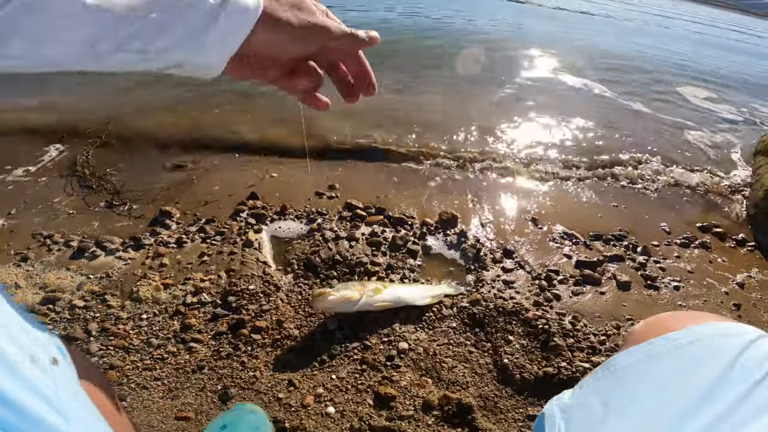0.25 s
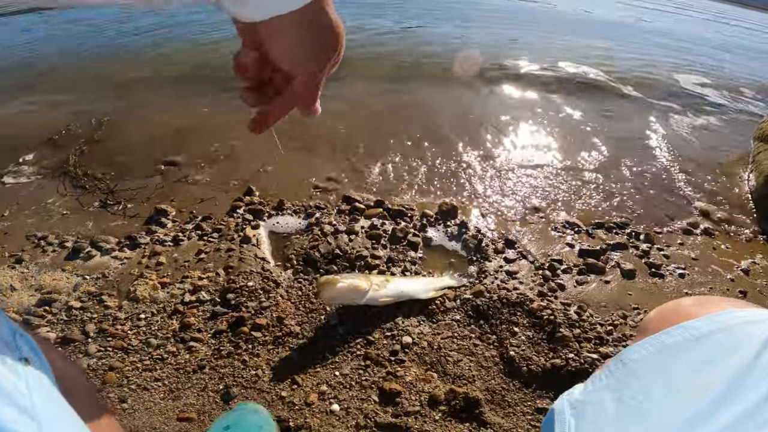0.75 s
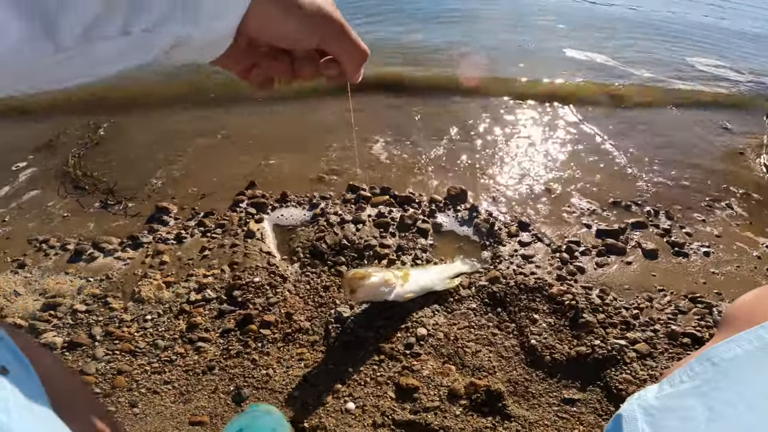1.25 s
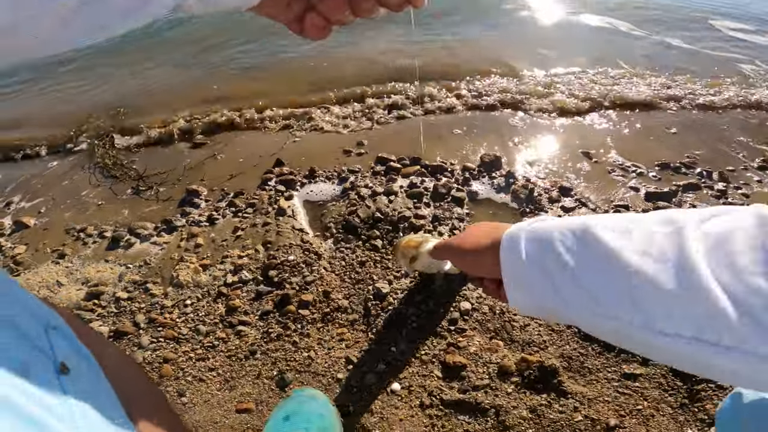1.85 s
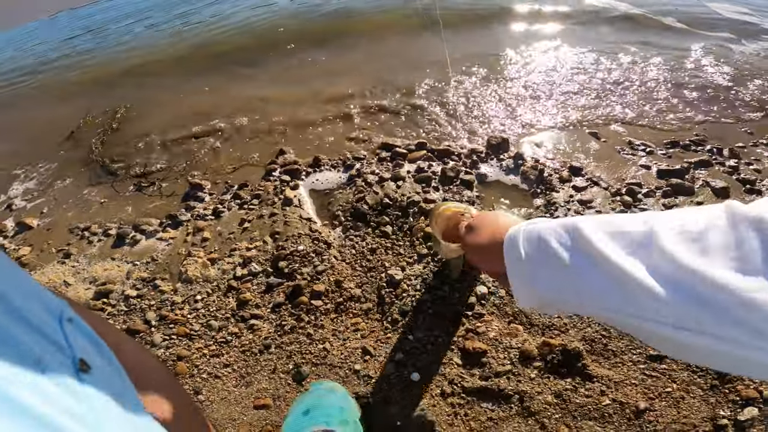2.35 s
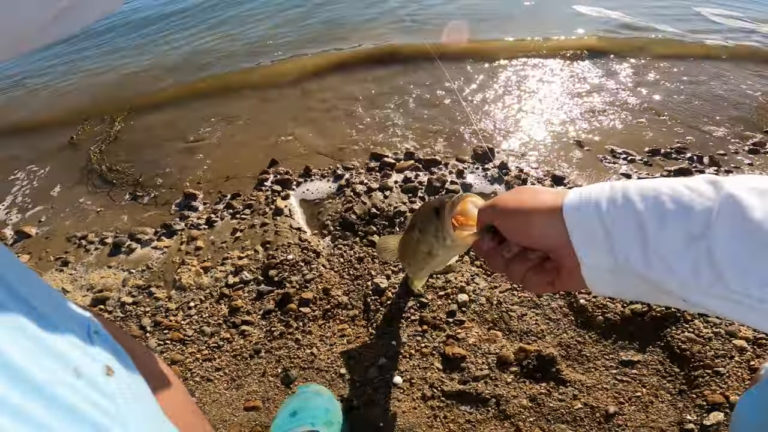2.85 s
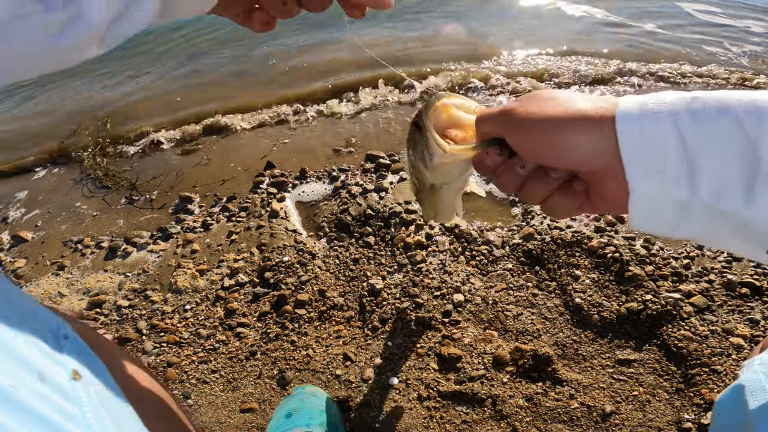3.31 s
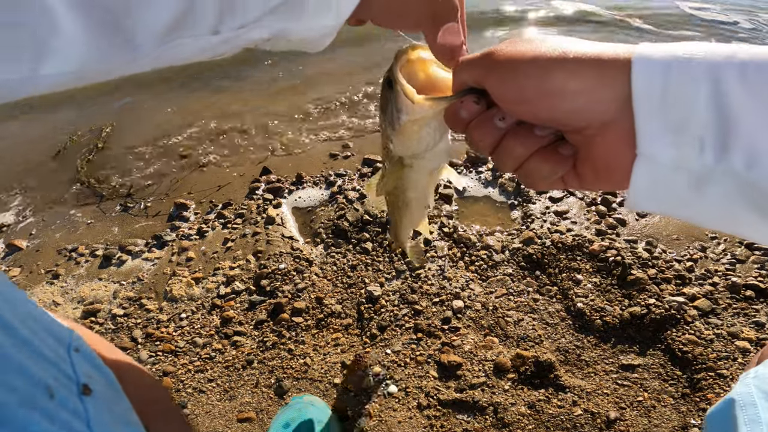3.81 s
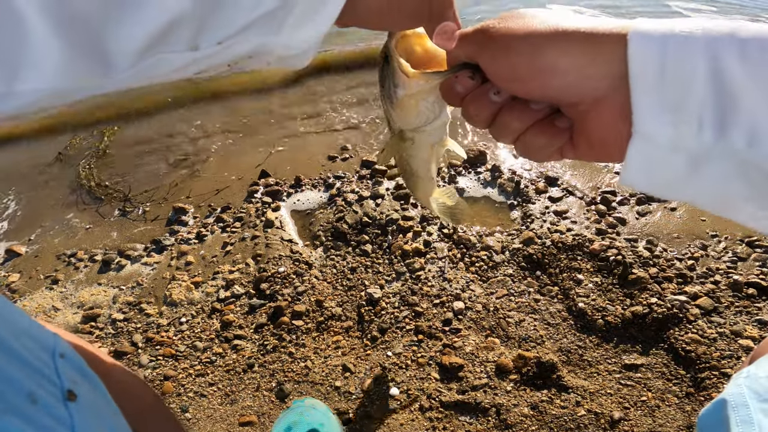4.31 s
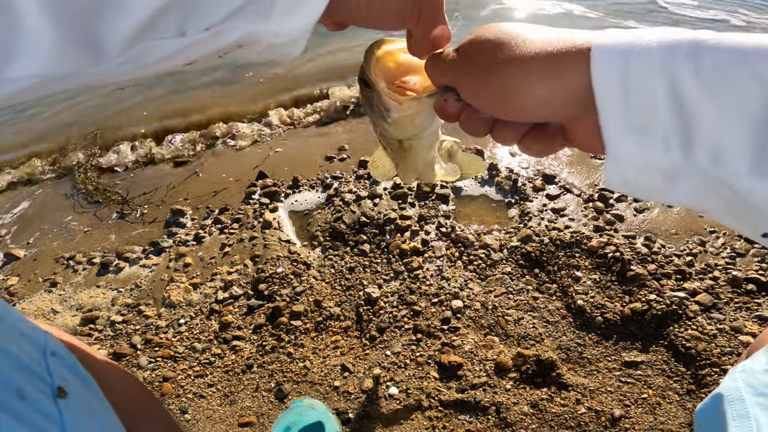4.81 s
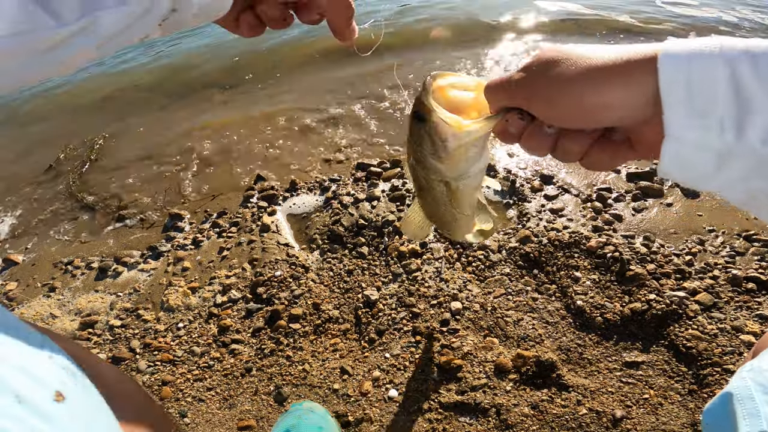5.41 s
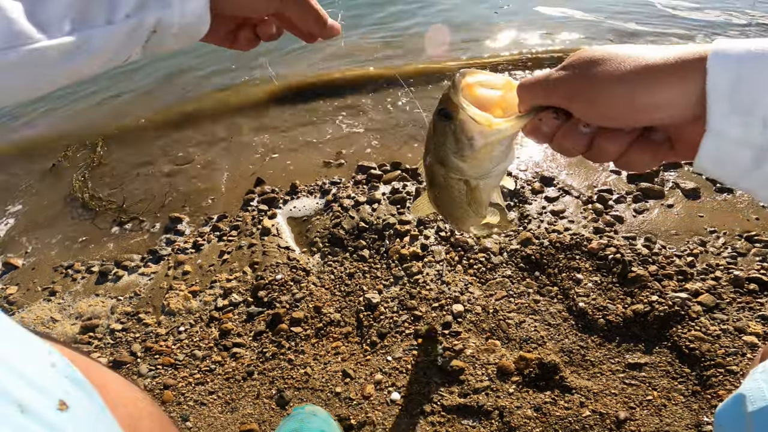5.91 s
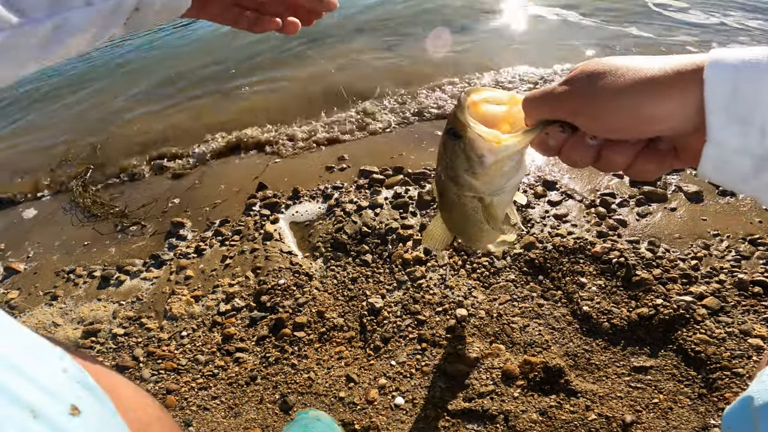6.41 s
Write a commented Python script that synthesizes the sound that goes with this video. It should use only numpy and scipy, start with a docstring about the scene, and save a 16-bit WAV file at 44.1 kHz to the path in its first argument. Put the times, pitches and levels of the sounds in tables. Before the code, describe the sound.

Small waves lap softly on a pebbly lake shore, heard from close to the water. They crest at about 0.3, 1.8, 3.5, 5.0 and 6.4 seconds. Each folds over with a light splash and a fizz of spray, while trapped air gives low, hollow gulps, small bubbles plink and droplets tick on the stones. The first wave is the gentlest, the second breaks quickly with the most fizz, and the third and fourth gurgle more fully. Between them, foam hisses away and the backwash bubbles quietly among the pebbles. At about 4.8 seconds, just before the fourth crest, something tiny and hard gives one short, bright click, close by and slightly to the left. A faint hiss of farther water and the low rumble of a light breeze continue underneath until the end, at about 6.7 seconds.

```python
"""Small waves on a pebbly lake shore.

Each wave folds over with a fizz of spray, traps pockets of air that gurgle, and drains among the stones.
Bubbles are damped sines rising in pitch; drops crack and ring on the stones. Something small snaps once,
close by on the left. Far water hisses, a light breeze rumbles, the microphone ports ring in the treble."""
import sys
import numpy as np
from scipy import signal
from scipy.fft import rfft, irfft, next_fast_len
from scipy.io import wavfile
from scipy.ndimage import uniform_filter1d, map_coordinates

SR = 44100
rng = np.random.default_rng(int(sys.argv[2]) if len(sys.argv) > 2 else 0)


def to_wav(sig):
    """Store sig (one row per channel, or 1-D mono) as 16-bit WAV at the path in sys.argv[1].

    Samples outside -1..1 are clipped; the rate is SR.
    """
    pcm = np.clip(np.atleast_2d(sig), -1, 1) * 32767
    pcm = np.round(pcm).astype(np.int16)
    wavfile.write(sys.argv[1], SR, pcm.T)  # frames by channels


N = 293739


def wash():
    """Body of the waves: low gurgle, mid splash, treble fizz and spatter, lingering foam."""
    # spectral shapes: f/Hz, density/dB
    gurgle_shape = [(110, -43), (160, -26), (210, 3), (390, 1.5), (600, -4.5), (850, -5), (1200, -39)]
    splash_shape = [(200, -58), (400, -9), (750, -9), (1150, -5), (1550, -8.5), (1900, -6.5), (2700, -10.5),
                    (4200, -13), (8000, -21.5)]
    fizz_shape = [(250, -45), (600, -11), (2000, 0.5), (4000, -2.5), (7000, -1), (12000, 0), (14500, 0.5),
                  (16000, -4.5)]
    foam_shape = [(1200, -30), (3000, -2.5), (7000, 0.5), (11000, 1), (16000, -7)]
    gurgle_gain, splash_gain, fizz_gain, foam_gain, pitch_hz = surges()
    steady = np.ones(N)
    vigour = np.clip((20 * np.log10(fizz_gain) + 71) / 18, .15, 1)  # calm backwash to breaking crest
    gurgle = swarm(gurgle_shape, pitch_hz, steady, octaves=0.343, cycles=15.5, rise=0.609, onset=0.052,
                   scatter_db=3.5, share=0.85, patchy_db=-0.5, throb_db=0.77, count=1700, samples=3500)
    splash = swarm(splash_shape, 1400 * steady, steady, octaves=0.698, cycles=21, rise=0.32, onset=0.13,
                   scatter_db=6, share=0.49, patchy_db=3, throb_db=0.9, count=5000, samples=900)
    fizz = swarm(fizz_shape, 7000 * steady, vigour, octaves=0.714, cycles=9, rise=0.2, onset=0.068,
                 scatter_db=0, share=0.39, patchy_db=4, throb_db=1.6, count=6000, samples=120)
    foam = coloured(patchy(depth_db=2.5), foam_shape)
    body = gurgle_gain * gurgle + splash_gain * splash + fizz_gain * fizz + foam_gain * foam
    return body + spatter(fizz_gain)


def surges():
    """Gains of gurgle, splash, fizz and foam; gurgle pitch, led by the loudest surge."""
    # breaking waves: crest/s, rise/s, hold/s, drain/s, gurgle/dB, gurgle/Hz, splash/dB, fizz/dB, foam/dB
    waves = [(0.341, 0.26, 0.23, 0.28, -49.5, 346, -49, -48.5, -54.5),
             (1.815, 0.088, 0.36, 0.22, -40, 346, -42.5, -41, -51),
             (3.479, 0.25, 0.072, 0.25, -38.5, 447, -41, -44.5, -66),
             (4.981, 0.25, 0.087, 0.22, -36, 393.7, -38.5, -43.5, -57.5),
             (6.358, 0.1, 0.04, 0.5, -40, 350.7, -41, -45, -65)]
    # lips curling ahead of the crests: t/s, hold/s, gurgle/dB, splash/dB, fizz/dB
    curls = [(-0.05, 0.34, -47.5, -46.5, -47.5), (1.641, 0.021, -52, -48.5, -43.5),
             (3.207, 0.49, -61.5, -56.5, -45), (4.742, 0.23, -56.5, -52.5, -48.5),
             (6.14, 0.2, -54, -53.5, -51.5)]
    # backwash among the stones: peak/s, drain/s, gurgle/dB, splash/dB, fizz/dB
    sloshes = [(0.84, 0.63, -51, -53, -55), (1.123, 0.77, -48, -54.5, -83), (1.42, 0.87, -61, -64, -83),
               (2.398, 0.39, -47.5, -59, -54), (2.62, 0.71, -45.5, -55, -56.5),
               (2.95, 0.034, -68, -63, -61), (3.9, 1, -57.5, -71, -59.5), (4.177, 0.75, -48.5, -56, -59.5),
               (4.52, 0.45, -54, -60, -60.5), (5.48, 0.6, -55.5, -64, -61), (5.647, 0.39, -47.5, -57, -90),
               (6.03, 0.23, -57, -60, -61.5)]
    air_lag_s, air_min_rise_s, curl_hz = 0.042, 0.073, 400  # trapped air answers after the crest
    gurgle, pitch, splash, fizz, foam = [], [], 0, 0, 0
    for s, rise, hold, drain, gurgle_db, gurgle_hz, splash_db, fizz_db, foam_db in waves:
        gurgle.append(lap(s + air_lag_s, max(rise, air_min_rise_s), hold, drain, gurgle_db))
        pitch.append(pocket_pitch(s + air_lag_s, gurgle_hz))
        splash += lap(s, rise, hold, drain, splash_db)
        fizz += lap(s, rise, 0.89 * hold, 1.11 * drain, fizz_db)
        foam += lap(s, rise, hold, drain_s=2.23, db=foam_db)
    minor = [(lap(s, rise_s=0.027, hold_s=hold, drain_s=0.314), curl_hz, levels)
             for s, hold, *levels in curls]
    minor += [(lap(s, rise_s=0.254, hold_s=0, drain_s=drain), pocket_pitch(s, peak_hz=429.7), levels)
              for s, drain, *levels in sloshes]
    for power, hz, (gurgle_db, splash_db, fizz_db) in minor:
        gurgle.append(amp(gurgle_db) ** 2 * power)
        pitch.append(hz)
        splash += amp(splash_db) ** 2 * power
        fizz += amp(fizz_db) ** 2 * power
    pitch_hz = sum(power * hz for power, hz in zip(gurgle, pitch)) / sum(gurgle)
    return np.sqrt(sum(gurgle)), np.sqrt(splash), np.sqrt(fizz), np.sqrt(foam), pitch_hz


def lap(peak_s, rise_s, hold_s, drain_s, db=0):
    """Power of one surge: rise, sagging hold and drain, each linear in dB."""
    span_db, sag_db_per_s = 20, 12.5
    t = np.arange(N) / SR - peak_s
    spans_below = np.maximum(-t / rise_s, (t - hold_s) / drain_s).clip(0)
    return amp(db - span_db * spans_below - sag_db_per_s * t.clip(0, hold_s)) ** 2


def pocket_pitch(peak_s, peak_hz):
    """Air pockets shrink as a surge runs out, so their pitch climbs."""
    climb_oct_per_s, range_hz = 2.59, (260, 682)
    return np.clip(peak_hz * 2 ** (climb_oct_per_s * (np.arange(N) / SR - peak_s)), *range_hz)


def swarm(shape, centre_hz, vigour, octaves, cycles, rise, onset,
          scatter_db, share, patchy_db, throb_db, count, samples):
    """Random bubbles over patchy noise, rms 1; vigorous water is grainier and throbs more."""
    at = rng.integers(0, N, count)
    hz = np.clip(centre_hz[at] * 2 ** (octaves * rng.standard_normal(count)), 120, 15000)
    db = scatter_db * np.clip(rng.standard_normal(count), -3, 2)
    crowd = coloured(bubbles(at / SR, db, hz, cycles, rise, onset, samples), shape)
    noise = coloured(patchy(patchy_db), shape)
    share = np.clip(share * vigour, 0, 1)
    mix = np.sqrt(share) * crowd + np.sqrt(1 - share) * noise
    throb = amp(throb_db * vigour * (wobble(17) + 0.48 * wobble(45)))
    return unit(mix * throb)


def bubbles(s, db, hz, cycles, rise, onset, samples):
    """Damped sines that climb as each bubble nears the surface; two strands."""
    t = np.arange(samples) / SR
    age = t * (hz / cycles)[:, None]  # in lifetimes, like onset
    taper = np.cos(np.pi / 2 * t * SR / samples)
    envelope = amp(db[:, None] - 32.4 * age) * (1 - np.exp(-age / onset)) * taper
    phase = 2 * np.pi * hz[:, None] * t * (1 + np.reshape(rise, (-1, 1)) * np.minimum(age, 2) / 2)
    at = (np.round(s * SR).astype(int)[:, None] + np.arange(samples)).ravel()
    offset_rad = 2 * np.pi * rng.random((len(s), 1))
    strands = [envelope * np.sin(phase + k * offset_rad) for k in (0, 1)]
    return np.array([np.bincount(at, strand.ravel(), N + samples)[:N] for strand in strands])


def pockets():
    """Single air pockets gulp; small bubbles plink, each shedding a brood of three."""
    # large air pockets: t/s, level/dB, f/Hz, life/cycles
    gulps = [(0.228, -25, 227, 5.6), (0.337, -19, 306, 11.4), (0.404, -29, 334, 10),
             (0.818, -26.5, 433, 24), (1.141, -25, 438, 19), (1.415, -29.5, 328, 8.8),
             (1.818, -20, 223, 7.2), (1.863, -20.5, 373, 5.9), (1.895, -29, 335, 5.5),
             (1.989, -20.5, 399, 19), (2.175, -21, 560, 7.7), (2.24, -27, 322, 8), (2.533, -32, 245, 9.2),
             (2.44, -40, 400, 4.9), (2.698, -24, 392, 3.4), (2.945, -34, 390, 17), (3.323, -24, 302, 5.6),
             (3.369, -20.5, 254, 5.8), (3.47, -15.5, 336, 3.9), (3.527, -19, 407, 18),
             (4.745, -27.5, 257, 7.9), (4.823, -18.5, 273, 14), (4.96, -13.5, 344, 6.6),
             (5.473, -33.5, 261, 20), (6.161, -30.5, 356, 16), (6.005, -35, 300, 16),
             (6.291, -28.5, 226, 12), (6.366, -25, 273, 10), (6.421, -26, 332, 14), (6.455, -17, 400, 3.9),
             (6.496, -23.5, 371, 29)]
    # small bubbles: t/s, level/dB, f/Hz, relative pitch rise
    plinks = [(0.175, -23, 1110, 0.071), (0.26, -29, 2320, 0.11), (0.3143, -23, 3630, 0.12),
              (0.359, -19, 2180, 0.076), (0.465, -18, 1085, 0.18), (0.519, -17, 847, 0.64),
              (0.542, -21, 1870, 0.18), (0.579, -21.5, 1630, 0.059), (0.6484, -20, 2540, 0.11),
              (1.78, -16.5, 1880, .1), (1.917, -14, 1053, 0.085), (2.0138, -11, 2450, 0.08),
              (2.156, -23, 870, 0.076), (2.443, -23.5, 760, 0.15), (2.6994, -28, 720, 0.078),
              (2.777, -28.5, 2520, 0.085), (3.038, -34, 1080, 0.091), (3.146, -35, 2360, 0.091),
              (3.2351, -11, 2960, 0.09), (3.39, -15.5, 1660, 0.082), (3.396, -21, 1044, 0.077),
              (3.489, -15.5, 1110, .1), (3.5986, -15, 1690, 0.084), (3.789, -27.5, 2350, 0.14),
              (4.901, -17.5, 1280, 0.064), (4.964, -14, 1350, 0.11), (4.982, -17, 1240, 0.11),
              (5.099, -10.5, 2880, 0.091), (5.226, -15, 1320, 0.064), (5.227, -21, 3100, 0.064),
              (5.243, -21.5, 612, 0.074), (6.029, -29.5, 1340, 0.07), (6.3586, -16, 2190, 0.1),
              (6.462, -20, 1170, 0.1), (6.628, -22, 1146, 0.12)]
    s, db, hz, cycles = np.transpose(gulps)
    low = bubbles(s, db, hz, cycles, rise=0.098, onset=0.32, samples=5000)
    s, db, hz, rise = np.transpose(plinks)
    cycles = 11 + 20 * rise
    late, size, pitch = rng.standard_normal((len(s), 3, 3)).transpose(2, 0, 1)
    brood_s = (s[:, None] + 0.0071 * abs(late)).ravel()
    brood_db = (db[:, None] - 12.5 + 3 * size).ravel()
    brood_hz = (hz[:, None] * 2 ** (.3 * pitch)).ravel()
    brood_cycles = np.repeat(0.49 * cycles, 3)
    brood = bubbles(brood_s, brood_db, brood_hz, brood_cycles, rise=.15, onset=0.49, samples=2000)
    return low + bubbles(s, db, hz, cycles, rise, onset=0.68, samples=2000) + brood


def drops():
    """Spray hits the stones: a brief ring and a broad crack per drop."""
    # impacts: t/s, level/dB, f/Hz, crack re ring/dB
    impacts = [(0.1746, -26.5, 5430, 5), (0.196, -34, 9650, 10), (0.335, -35, 10200, 13),
               (0.405, -30, 8160, 0.5), (0.42, -27, 13900, -17), (0.488, -24, 7500, -2),
               (0.833, -32, 7750, -1), (1.647, -32, 9800, -2), (1.7835, -21.5, 5700, -0.5),
               (1.8015, -20, 4900, -22), (1.861, -21, 9350, -8), (1.912, -23.5, 9000, 4),
               (1.9227, -23.5, 8740, 2.5), (1.971, -27.5, 8900, 4.5), (2.064, -28, 11200, -14),
               (2.907, -50, 8850, 14), (3.029, -42.5, 4540, -10), (3.101, -57, 5030, -15),
               (3.144, -38, 7200, -6), (3.168, -41, 9400, -14), (3.1829, -27.5, 13600, 0.5),
               (3.256, -48, 10300, -10), (3.2966, -25.5, 5400, -15), (3.574, -27.5, 10000, -29),
               (3.717, -38, 4570, -10), (4.6769, -35.5, 9150, -2.5), (4.943, -43, 10800, 16),
               (5.099, -38, 10000, 8), (5.227, -35.5, 9670, 3), (5.594, -52, 13300, -6),
               (6.358, -26.5, 7240, -14), (6.369, -30.5, 9360, 8)]
    crack_t60_s, ring_t60_s = 0.018, 0.0061
    out, t = np.zeros((2, N + SR)), np.arange(400) / SR
    for s, db, hz, crack_db in impacts:
        noise = rng.standard_normal((2, len(t)))
        crack = amp(crack_db - 60 * t / crack_t60_s) * (1 - np.exp(-t / 0.0017)) * noise
        phase = 2 * np.pi * (hz * t + rng.random((2, 1)))
        ring = amp(-60 * t / ring_t60_s) * (1 - np.exp(-t / 0.0001)) * np.sin(phase)
        out[:, round(s * SR):][:, :len(t)] += amp(db) * (crack + ring)
    return drop_highpass(out[:, :N])


def spatter(fizz_gain, count=160, centre_hz=5100):
    """Stray drops tick at random; their level follows the fizz."""
    s = rng.integers(0, N, count) / SR
    db = 4 - 4.5 * np.minimum(rng.exponential(size=count), 3)
    hz = np.clip(centre_hz * 2 ** rng.standard_normal(count), 1500, 14000)
    return fizz_gain * drop_highpass(bubbles(s, db, hz, cycles=8, rise=.1, onset=0.2, samples=300))


def drop_highpass(x, corner_hz=1400):
    """Drops are too small to radiate bass."""
    return filtered(x, lambda hz: hz ** 2 / (hz ** 2 + corner_hz ** 2))


def snap():
    """A tiny hard object rings for milliseconds, rattles and rebounds."""
    # snap and rebound: t/s, level/dB, main mode offset/dB
    hits = [(4.8340, -9, 0), (4.8392, -9, -10)]
    # modes of the object: f/Hz, level/dB, t60/s
    modes = [(4500, -11, .002), (6500, -13, .0015), (9500, 0, .0038), (10700, -8, .003), (14000, -9, .0025)]
    lag_s, pan_db = np.array([[24e-6], [0]]), np.array([[0.8], [-0.3]])  # left, right
    out, t = np.zeros((2, N)), np.arange(700) / SR
    hz, mode_db, t60_s = np.transpose(modes)[:, :, None, None]
    for s, db, main_db in hits:
        struck_db = mode_db + main_db * (mode_db == mode_db.max())
        ring = np.sum(amp(struck_db - 60 * t / t60_s) * np.sin(2 * np.pi * hz * (t - lag_s)), axis=0)
        rattle = amp(-15 - 60 * t / .016) * rng.standard_normal((2, len(t)))
        out[:, round(s * SR):][:, :len(t)] += amp(db + pan_db) * (ring + rattle)
    return filtered(out, lambda f: (1j * f / (1j * f + 2500)) ** 2)  # too small to radiate bass


def breeze():
    """Low, lumpy rumble of moving air."""
    # rumble spectrum: f/Hz, density/dB
    shape = [(8.8, -43), (15, 11), (51, 0), (123, -8.5), (165, -13), (190, -15), (250, -80), (420, -120)]
    # breeze strength: t/s, level/dB
    trend = [(0.0, -53.5), (6.66, -55.5)]
    rumble = coloured(rng.standard_normal((2, N)), shape)
    db = np.interp(np.arange(N) / SR, *np.transpose(trend))
    return amp(db + 0.31 * wobble(5.3)) * rumble


def lake(level_db=-68.5):
    """Smooth hiss of water farther along the shore."""
    # far water spectrum: f/Hz, density/dB
    shape = [(150, -12), (400, 3), (800, -27), (1300, 0.5), (4000, -28), (8000, -18), (14500, -41),
             (16500, -45)]
    return amp(level_db) * coloured(patchy(depth_db=2), shape)


def spread(strands):
    """Two strands become left and right, more alike in the bass than in the treble."""
    # left-right likeness: f/Hz, coherence
    alike = [(30, 0.94), (250, 1), (600, 0.99), (1500, 0.98), (4000, 0.94), (7000, 0.78), (10000, 0.85),
             (15000, 0.92)]

    def weights(hz):
        angle = np.arccos(np.clip(along(alike, hz), -1, 1)) / 2
        return np.array([np.cos(angle), np.sin(angle)])
    mid, side = filtered(strands, weights)
    return np.array([mid + side, mid - side])


def patchy(depth_db):
    """Two strands of white noise, level varying in small time-frequency patches."""
    spectra = signal.stft(rng.standard_normal((2, N)), nperseg=256)[2]
    field = uniform_filter1d(rng.standard_normal(spectra.shape[1:]), size=9, axis=0)
    field = uniform_filter1d(field, size=7, axis=1)
    return signal.istft(spectra * amp(depth_db * unit(field)), nperseg=256)[1][:, :N]


def wobble(knots_per_s):
    """Smooth random curve."""
    knots = rng.standard_normal(int(N * knots_per_s / SR) + 4)
    return map_coordinates(knots, [np.arange(N) * knots_per_s / SR])


def coloured(x, shape):
    """x shaped by (f/Hz, gain/dB) points, rms 1."""
    return unit(filtered(x, lambda hz: amp(along(shape, hz))))


def filtered(x, response):
    """Apply a complex frequency response."""
    m = next_fast_len(N + 8192)
    return irfft(rfft(x, m) * response(np.fft.rfftfreq(m, 1 / SR)), m)[..., :N]


def along(points, hz):
    """Interpolate (f/Hz, value) points on a log axis."""
    f, value = np.transpose(points)
    return np.interp(np.log(hz + 1), np.log(f + 1), value)


def amp(db):
    """dB to gain."""
    return 10 ** (np.asarray(db) / 20)


def unit(x):
    """Scale to rms 1."""
    return x / np.sqrt(np.mean(x ** 2) + 1e-20)


def scene():
    """Water and air in stereo, plus the close snap."""
    return spread(wash() + lake() + pockets() + drops() + breeze()) + snap()


def record(dry, top_hz=15750):
    """Each microphone port adds its resonances and arrival phase; the top is cut off."""
    # port resonances and a notch: f/Hz, width/Hz, left/dB, right/dB
    ports = [(9440, 2050, 6.5, 2), (12000, 1100, -4, -5), (14000, 700, 5.5, 2.5)]
    # phase lead of the left port: f/Hz, lead/rad
    lead = [(500, -0.022), (3500, 0.0047), (6500, -0.061), (9000, 0.17), (16000, 0.11)]

    def response(f):
        ring = 0
        for hz, width_hz, left_db, right_db in ports:
            band = 1j * f * width_hz / (hz * hz - f * f + 1j * f * width_hz)
            ring += (amp([[left_db], [right_db]]) - 1) * band
        arrival = np.exp(.5j * along(lead, f) * np.array([[1], [-1]]))
        return (1 + ring) * arrival * (f < top_hz)
    return filtered(dry, response)


dry = scene()
out = record(dry)
to_wav(out)
```